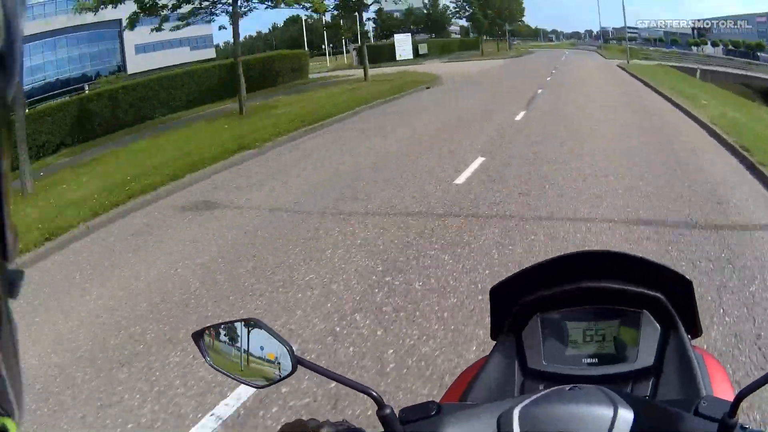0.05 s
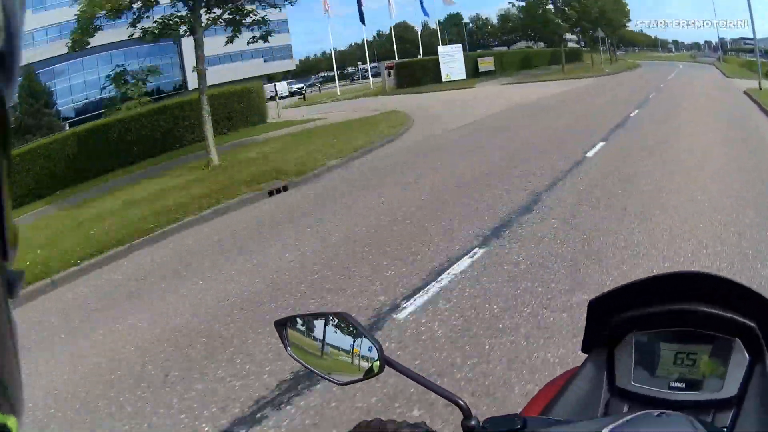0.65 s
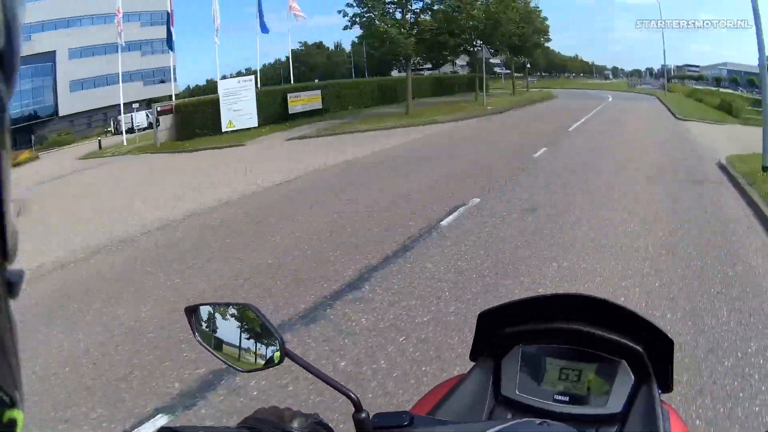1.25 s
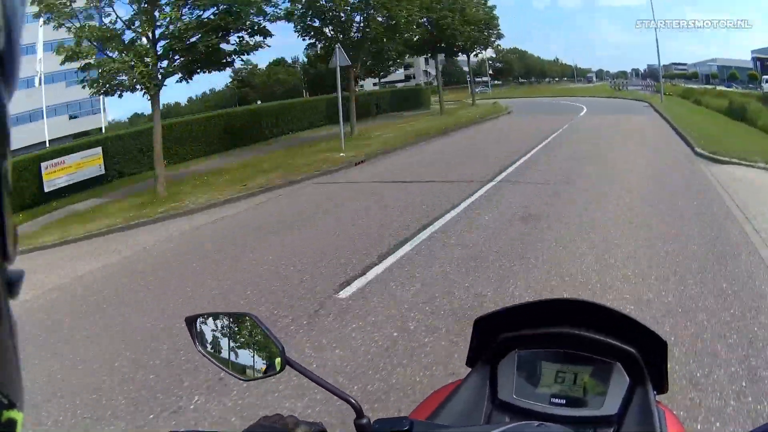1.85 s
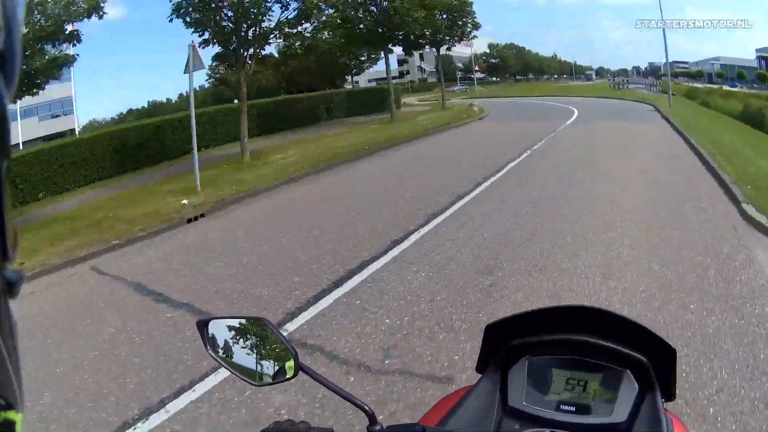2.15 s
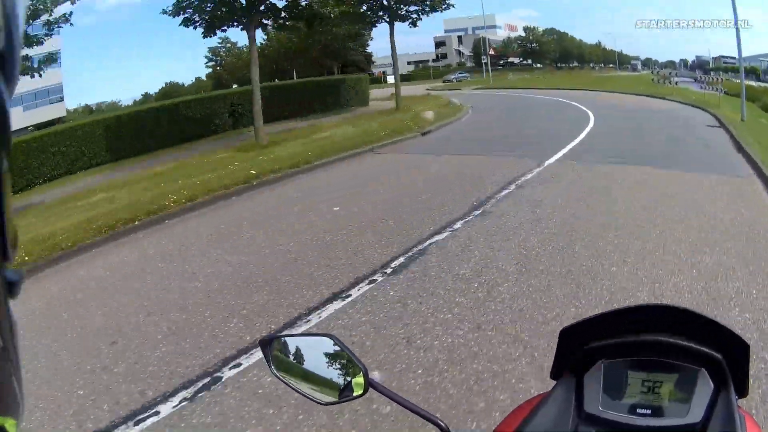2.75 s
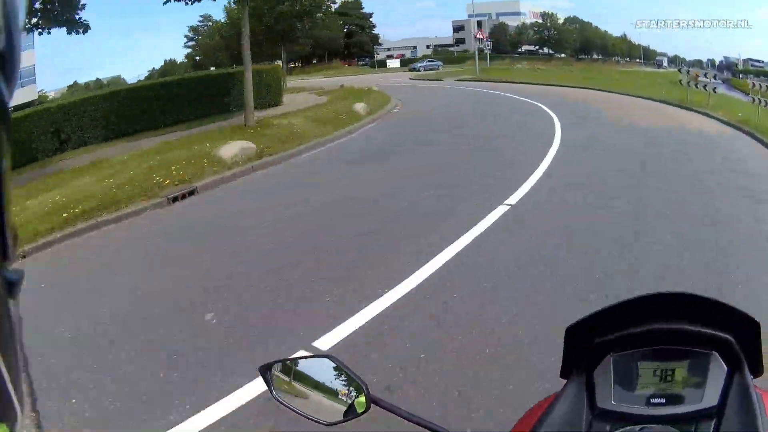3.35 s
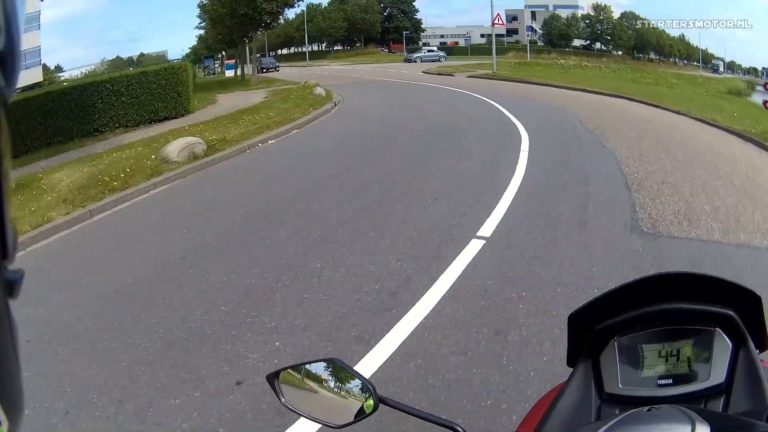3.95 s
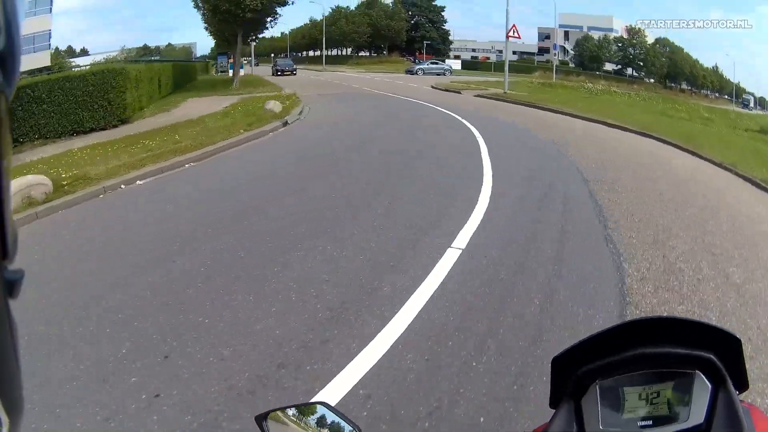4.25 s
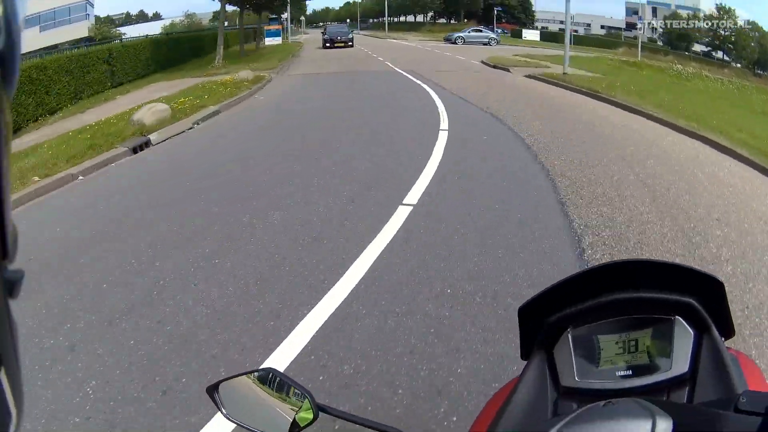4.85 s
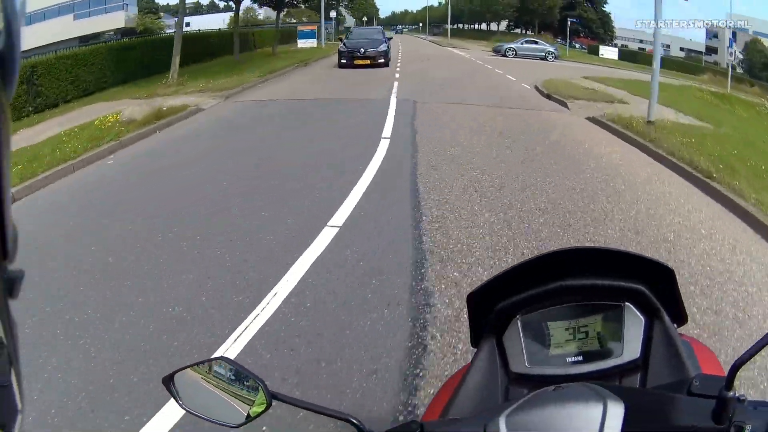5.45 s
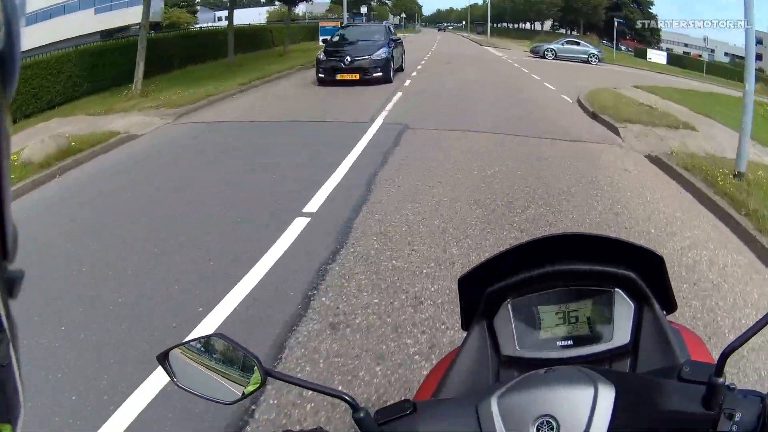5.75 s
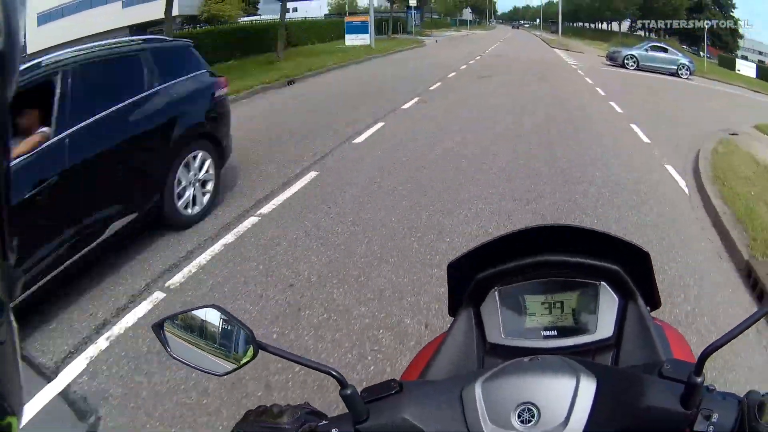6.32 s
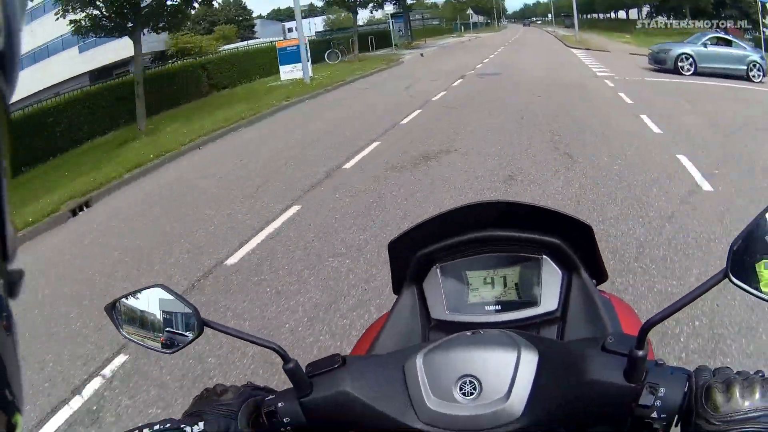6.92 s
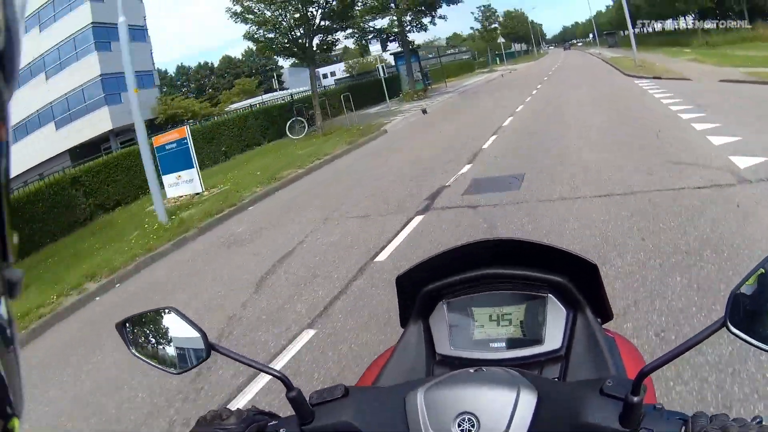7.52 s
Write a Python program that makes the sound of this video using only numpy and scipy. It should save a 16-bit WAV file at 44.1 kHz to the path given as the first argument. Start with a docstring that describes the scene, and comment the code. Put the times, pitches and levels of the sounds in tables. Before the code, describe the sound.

A small scooter engine eases off, burbles while coasting, then revs up again, with road roar, buffeting wind and a faint passing car.

```python
"""A single-cylinder scooter shuts its throttle, coasts through a bend and pulls away; microphone at the
rider's helmet, in the open air. Under power each firing thumps the exhaust, honks the airbox and barks
off the panels; on the overrun the engine only burbles and the drive whines. Tyres and air roar underneath,
wind buffets the microphone, and the rider's gear rustles and ticks close by. Short dull knocks sound while
it coasts, then hard, ragged firings as it pulls away; near the end a car passes two metres off."""
import sys
import numpy as np
from scipy import signal
from scipy.fft import rfft, irfft, next_fast_len
from scipy.io import wavfile
from scipy.ndimage import uniform_filter1d, map_coordinates

SR = 44100
rng = np.random.default_rng(int(sys.argv[2]) if len(sys.argv) > 2 else 0)


def inscribe(sig):
    """Save sig as 16-bit PCM at rate SR to the path in sys.argv[1].

    A 1-D sig is mono; a 2-D sig holds one channel per row.
    Samples are clipped to [-1, 1] before scaling.
    """
    pcm = np.round(np.clip(np.atleast_2d(sig).T, -1, 1) * 32767)
    wavfile.write(sys.argv[1], SR, pcm.astype(np.int16))


N = 334278
TIME = np.arange(N) / SR

# engine speed: time_s, firing_hz
FIRING_RATE = [(0, 56.8), (.21, 49.4), (.36, 44.3), (.59, 41), (1.15, 39.4), (1.65, 38.3), (2.2, 35.6),
               (2.45, 34.4), (3.2, 31.3), (4.1, 29.6), (4.75, 28.6), (5.03, 33.1), (5.3, 40.6),
               (5.55, 46.4), (5.8, 50.7), (6.02, 53.7), (6.25, 54.85), (6.6, 55.9), (7.58, 57.45)]
# the throttle shuts, opens after the bend, then eases a little: time_s, load_db
ENGINE_LOAD = [(0, 3), (.09, -14.5), (.25, -11.5), (.42, -8.5), (.6, -23.5), (4.66, -27), (4.78, -9),
               (4.92, -3), (5.05, -3.5), (5.19, 1.5), (5.3, -2.5), (5.7, -1), (5.85, 2.5), (6.5, 1.5),
               (6.7, -0.54), (7.58, -0.5)]
# the scooter's pace: time_s, speed_kmh
ROAD_SPEED = [(0, 64), (.8, 65), (1.6, 62.2), (2.3, 58.5), (2.75, 54.3), (3.3, 48.9), (4, 44), (5.3, 36),
              (7.58, 46)]
# gusts around the helmet: centre_s, half_width_s, buffet_db, roar_db
WIND_GUSTS = [(0, 0.13, -32, -29), (0.98, 0.12, -24.5, -38.5), (1.27, 0.076, -34, -35.5),
              (1.65, 0.28, -30.5, -38.5), (2.29, 0.084, -26.5, -51), (3.643, 0.077, -21.5, -37),
              (3.944, 0.045, -26.5, -54), (4.43, 0.076, -30, -35), (6.506, 0.16, -34, -42)]


def amp(db):
    """Decibels to gain."""
    return 10 ** (np.asarray(db) / 20)


def unit(x):
    """Scales to rms 1."""
    return x / np.sqrt(np.mean(x ** 2) + 1e-20)


def curves(rows):
    """Each column of a time table at every sample."""
    times, *columns = np.transpose(rows)
    return [np.interp(TIME, times, column) for column in columns]


def response(spectrum, hz):
    """Gain of a spectrum at hz, falling 30 dB in the octave beyond each end."""
    freqs, db = np.transpose(spectrum)
    freqs, db = np.r_[freqs[0] / 2, freqs, freqs[-1] * 2], np.r_[db[0] - 30, db, db[-1] - 30]
    return amp(np.interp(np.log(hz + 1e-3), np.log(freqs), db))


def colour(x, spectrum):
    """Filters x by a spectrum."""
    size = next_fast_len(N)
    return irfft(rfft(x, size) * response(spectrum, np.fft.rfftfreq(size, 1 / SR)), size)[:N]


def wander(rate_hz):
    """Smooth random motion of rms 1."""
    knots = rng.standard_normal(8192)
    return unit(np.interp(TIME * rate_hz * 2, np.arange(len(knots)), knots))


def swell(centre_s, half_width_s):
    """A bell-shaped rise and fall of height 1."""
    return np.exp(-((TIME - centre_s) / half_width_s) ** 2)


def per_firing(cycles):
    """Glides to a new random value each cycle."""
    return np.interp(cycles, np.arange(N), rng.standard_normal(N))


def by_speed(cruise_db, per_octave, cruise_kmh=65):
    """Level in dB of a sound that grows with road speed."""
    return cruise_db + per_octave * np.log2(curves(ROAD_SPEED)[0] / cruise_kmh)


def rev_octaves(pulling_hz=56):
    """Engine speed in octaves above pulling revs."""
    return np.log2(curves(FIRING_RATE)[0] / pulling_hz)


def by_engine(pulling_db, per_octave, per_load):
    """Level in dB of a sound that grows with revs and load."""
    return pulling_db + per_octave * rev_octaves() + per_load * curves(ENGINE_LOAD)[0]


def hum(hz, orders, waver, flutter_db=1.5):
    """A turning part: wavering lines on multiples of its speed; orders lists multiple, level_db."""
    turns = np.cumsum(hz * (1 + waver * wander(60))) / SR
    return unit(sum(amp(db + flutter_db * wander(6.5)) * np.sin(2 * np.pi * k * turns) for k, db in orders))


def pulses(cycles, hz, spectrum, smear_rad, first, last, tilt_db=0, odd_db=0, sway_db=0):
    """Firing pulses ring a resonant body; harmonics first to last can sway as the rider's head moves."""
    grid = np.fft.fftfreq(8192, 1 / SR)
    minimum_phase = -signal.hilbert(np.log(response(spectrum, abs(grid)))).imag
    frames = np.arange(0, N, 256)
    multiples = np.arange(first, last + 1)[:, None]
    harmonic_hz = multiples * hz[frames]
    phases = np.interp(harmonic_hz, grid[grid >= 0], minimum_phase[grid >= 0])
    phases += smear_rad * rng.standard_normal(multiples.shape)
    sway = unit(uniform_filter1d(uniform_filter1d(rng.standard_normal(phases.shape), 30), 20))
    odd = (multiples % 2 == 1) & (multiples > 1)
    brightening_db = np.log2(multiples) * (tilt_db * np.ones(N))[frames]
    gains = response(spectrum, harmonic_hz) * amp(brightening_db + odd_db * odd + sway_db * sway)
    gains /= np.sqrt((gains ** 2).sum(0) / 2)  # rms 1 at any revs
    angle = 2 * np.pi * (cycles % 1)
    return sum(np.interp(TIME, TIME[frames], gain) * np.cos(k * angle + np.interp(TIME, TIME[frames], phase))
               for k, (gain, phase) in enumerate(zip(gains, phases), first))


def puffs(cycles, spectrum, fall_db, shift=1):
    """Turbulent gas bursts out once a cycle and dies away; shift scales its resonances."""
    clock = np.cumsum(shift * np.ones(N)) / SR
    bursts = rng.standard_normal(N) * amp(-fall_db * (np.interp(TIME, clock, cycles) % 1))
    return unit(map_coordinates(colour(bursts, spectrum), [clock * SR], mode="mirror"))


def crackle(spectrum, per_s, spread_db):
    """Random tiny snaps, a few much larger than the rest, filtered by a spectrum."""
    sizes = amp(spread_db * np.minimum(rng.exponential(1, N), 2.8))
    snaps = (rng.random(N) < per_s / SR) * sizes * rng.choice([-1, 1], N)
    return unit(colour(snaps, spectrum))


def road_roar():
    """Tyre and air roar grows with speed, swells in gusts and flutters with turbulence at the helmet."""
    roar_spectrum = [(30, 9.5), (70, 7), (150, -3.5), (300, -1.5), (500, -2), (620, -2), (730, -10),
                     (850, -6.5), (1100, -17.5), (1450, -24), (2100, -29), (2900, -38), (4000, -40),
                     (5000, -52), (13000, -69)]  # tyres and air: freq_hz, level_db
    roar = unit(colour(rng.standard_normal(N) * amp(wander(35)), roar_spectrum))
    gusts = sum(amp(db) * swell(s, width) for s, width, _, db in WIND_GUSTS)
    return np.hypot(amp(by_speed(-31.5, per_octave=12.5)), gusts) * roar


def wind_buffet():
    """Lumps of air pressure on the microphone: headwind plus gusts, with a lull as the bend ends."""
    buffet_spectrum = [(5, 2), (16, 6.5), (30, 2), (55, -6.5), (85, -18.5), (140, -24), (400, -53)]  # pressure on the microphone: freq_hz, level_db
    lumps = unit(colour(rng.standard_normal(N), buffet_spectrum))
    lumps /= np.sqrt(uniform_filter1d(lumps ** 2, SR // 6) + 1e-6)  # evens out slow swings
    gusts = sum(amp(db) * swell(s, width) for s, width, db, _ in WIND_GUSTS)
    lull_db = -6 * swell(4.9, .22)
    return np.hypot(amp(by_speed(-30.5, per_octave=3.3) + lull_db), gusts) * lumps


def passing_car(closest_s=6.48, closest_m=2.0, closing_m_per_s=21, closest_db=-45.5):
    """The tyres of a car in the other lane swell and fade with distance."""
    tyre_swish = [(500, -9), (1000, 1.5), (1500, 1), (2200, -5.5), (3200, -22), (6000, -38.5)]  # freq_hz, level_db
    distance_m = np.hypot(closest_m, closing_m_per_s * (TIME - closest_s))
    return amp(closest_db) * closest_m / distance_m * unit(colour(rng.standard_normal(N), tyre_swish))


def fabric_rustle():
    """Close to the microphone, fabric rubs in short gritty bursts and rustles as the rider shifts."""
    fabric_spectrum = [(500, -11), (1200, 15), (1900, 9), (3800, 2.5), (5000, 0), (7000, -4),
                       (10000, -11.5), (12500, -22.5), (15000, -28)]  # rubbing cloth: freq_hz, level_db
    rubs = [(0.155, 0.043, -53), (0.209, 0.066, -49), (0.326, 0.046, -47), (0.367, 0.086, -53),
            (0.496, .06, -56.5), (0.56, 0.042, -52), (3.205, 0.051, -61), (3.392, 0.047, -57.5),
            (3.459, 0.056, -49), (3.512, 0.048, -55.5), (3.59, 0.062, -52), (3.638, 0.029, -45.5),
            (3.711, 0.027, -52), (3.763, 0.021, -51.5), (3.815, 0.03, -56), (3.918, 0.05, -58),
            (4.339, 0.044, -57), (4.438, 0.05, -50.5), (4.49, 0.05, -50), (4.834, 0.074, -59.5),
            (4.984, 0.034, -57), (6.553, 0.07, -58)]  # brief rubs: centre_s, width_s, level_db
    fidgets = [(.42, .3, -64), (3.728, 0.13, -60.5), (4.077, 0.048, -62), (4.207, 0.074, -61.5),
               (4.592, 0.3, -69), (5.187, 0.035, -57.5), (5.33, 0.076, -59), (6.503, 0.11, -63)]  # faint spells of rustling: centre_s, half_width_s, level_db
    rubbing = sum(amp(db) * swell(s, width / 2) for s, width, db in rubs)
    fidgeting = sum(amp(db) * swell(s, width) for s, width, db in fidgets) * amp(.5 * wander(19))
    return np.hypot(rubbing, fidgeting) * crackle(fabric_spectrum, per_s=4000, spread_db=5.5)


def fasteners(tick_gain_db=10.5, decay_s=.0002):
    """The rider's fasteners rattle in the airflow and with the engine's shaking; a few tick sharply."""
    rattle_spectrum = [(2000, -26.5), (4500, 1.5), (7000, -4.5), (9000, -10.5), (11000, -14), (13000, -29)]  # small fasteners: freq_hz, level_db
    ticks = [(0.191, -53, 5990), (0.2712, -45, 6860), (0.511, -54, 6500), (0.9785, -53, 5750),
             (1.373, -55, 6170), (1.5558, -51, 6000), (1.803, -58, 6360), (2.043, -56, 5930),
             (2.6222, -59, 6010), (3.205, -53, 7200), (3.613, -57, 10500), (3.924, -53, 5850),
             (4.0826, -49, 6770), (4.357, -56, 7000), (5.1292, -53.5, 6030), (5.6604, -53.5, 6700),
             (6.3714, -53.5, 5800)]  # single sharp ticks: start_s, level_db, pitch_hz
    airflow = amp(by_speed(-76.5, per_octave=5.8))
    shaking = amp(by_engine(-74, per_octave=10, per_load=.5))
    out = np.hypot(airflow, shaking) * amp(2.2 * wander(12))
    out *= crackle(rattle_spectrum, per_s=700, spread_db=4)
    age = TIME[:1000]
    for s, db, hz in ticks:
        ring = np.exp(-age / decay_s) * np.sin(2 * np.pi * hz * age)
        out[round(s * SR):][:len(age)] += amp(db + tick_gain_db) * ring
    return out


def knocks_and_hard_firings(gain_db=2, rise_s=.0007, decay_s=.004):
    """Short dull knocks while coasting, then hard, ragged firings pulling away; each rings briefly."""
    knocks = [(0.585, -24, 600), (0.8, -29, 611), (1.33, -24.5, 592), (1.458, -25, 584),
              (2.248, -35.5, 730), (4.812, -33, 538), (5.012, -31, 540), (5.327, -33, 814),
              (5.445, -26, 616), (5.535, -22, 560)]  # dull knocks, from 4.8 s hard firings: start_s, level_db, pitch_hz
    ring_modes = [(1, 1.5), (1.45, -8.5), (2.05, -18.5)]  # partials of each ring: pitch_multiple, level_db
    out, age = np.zeros(N), TIME[:SR // 20]
    envelope = (1 - np.exp(-age / rise_s)) * np.exp(-age / decay_s)
    for s, db, hz in knocks:
        ring = sum(amp(mode_db) * np.sin(2 * np.pi * k * hz * age) for k, mode_db in ring_modes)
        out[round(s * SR):][:len(age)] += amp(db + gain_db) * envelope * ring
    return out


def drive(gear_hz_per_kmh=23.17):
    """The belt drive hums on two falling notes; the gears whine and sizzle, following road speed."""
    belt_hum = [(.3, 139.8, -53, -57), (1, 132.7, -40, -46), (1.3, 129.8, -43.5, -40.5),
                (1.7, 126.5, -51, -43.5), (2, 120.1, -60, -49), (2.45, 108.5, -43.5, -55),
                (2.8, 101.1, -49, -43.5), (3.3, 92.6, -55, -44.5), (3.8, 85.4, -64, -56),
                (4.6, 75.4, -80, -80)]  # time_s, base_hz, second_harmonic_db, third_harmonic_db
    gear_cover = [(1050, -59.5), (1200, -53.5), (1330, -62), (1480, -65.5)]  # how loudly the cover rings: pitch_hz, level_db
    gear_sizzle = [(2700, -23.5), (3300, -2), (3570, 6), (3720, 2), (3900, 5), (4030, -7), (4200, 1.5),
                   (4400, -11), (5000, -22)]  # freq_hz, level_db
    belt_hz, second_db, third_db = curves(belt_hum)
    belt = amp(second_db) * hum(belt_hz, [(2, 0)], waver=.006)
    belt += amp(third_db) * hum(belt_hz, [(3, 0)], waver=.005)
    gear_hz = gear_hz_per_kmh * curves(ROAD_SPEED)[0]
    whine = response(gear_cover, gear_hz) * hum(gear_hz, [(1, 0)], waver=.04)
    sizzle = amp(by_speed(-75.5, per_octave=3.9)) * unit(colour(rng.standard_normal(N), gear_sizzle))
    return belt + whine + sizzle


def overrun(cycles, hz, load_db, shut_db=-5.5):
    """A note runs down as the throttle snaps shut; a burble takes over once the load is below shut_db."""
    burble_spectrum = [(30, -9.5), (65, -21), (95, -1.5), (118, -0.5), (135, 2), (152, -13.5), (200, -16),
                       (265, -13.5), (305, -12.5), (360, -9.5), (480, -9), (540, -24.5), (610, -14.5),
                       (700, -27.5), (950, -23.5), (1500, -32)]  # the coasting engine: freq_hz, level_db
    run_down_orders = [(8, 5), (10.1, -1), (12.1, 0), (17, -11)]  # lines of the falling note: firing_multiple, level_db
    shut = 1 / (1 + amp(load_db - shut_db) ** 2)
    burble_db = by_engine(-34.5, per_octave=3.43, per_load=0) + 1.5 * wander(6)
    burble = pulses(cycles, hz, burble_spectrum, smear_rad=1.53, first=1, last=44, sway_db=1.8)
    run_down = amp(-33) * swell(.03, .22) * hum(hz, run_down_orders, waver=.0032)
    return shut * amp(burble_db) * burble + run_down


def gas_rush(blowdown):
    """Exhaust gas hisses out, pulsing slightly with each firing."""
    rush_spectrum = [(90, -8), (320, -0.5), (490, 0.5), (590, 2.5), (710, -3.5), (920, -4.5), (1300, -9),
                     (1500, -18.5), (2100, -26.5), (3000, -36.5), (4100, -35.5), (5000, -45), (7000, -52.5),
                     (13000, -78)]  # gas noise: freq_hz, level_db
    return amp(by_engine(-31.5, per_octave=17, per_load=.53)) * puffs(blowdown, rush_spectrum, fall_db=1)


def panel_bark(blowdown, hz, load_db, rough, uneven_db=1.2):
    """Firings bark off the panels: ragged cracks at low revs, firming into a tone as the revs rise."""
    bark_spectrum = [(740, -30.5), (790, -13.5), (840, -1.5), (885, 7.5), (915, 6.5), (965, 7.5),
                     (1010, -1.5), (1060, -20.5), (1100, 6), (1160, -9.5), (1210, -2.5), (1240, -7),
                     (1275, -3), (1315, -14), (1365, -2.5), (1420, -12), (1530, -22), (1630, -28),
                     (1720, -18.5), (1900, -34), (3400, -52.5)]  # the firm tone: freq_hz, level_db
    rasp_spectrum = [(740, -28), (850, 0.5), (940, 5.5), (1020, -9), (1110, -10.5), (1350, -23.5),
                     (1500, -31.5), (2400, -35.5)]  # the ragged cracks: freq_hz, level_db
    tilt_db = 2.8 * np.clip(load_db, -2.5, 2.5)  # per octave: brighter under load
    tone = pulses(blowdown, hz, bark_spectrum, smear_rad=.3, first=10, last=64, tilt_db=tilt_db)
    cracks = puffs(blowdown, rasp_spectrum, fall_db=36)
    level_db = by_engine(-34, per_octave=11.5, per_load=.83) + uneven_db * per_firing(blowdown)
    return amp(level_db) * (1.2 * (1 - rough) * tone + 1.3 * rough * cracks)


def airbox_honk(intake, hz, rough, airbox_hz=425):
    """Each intake pulse rings the airbox, breathier and more uneven at low revs."""
    airbox_spectrum = [(200, -10), (270, -17.5), (335, -11.5), (380, -11.5), (420, -1.5), (452, -3.5),
                       (478, -6.5), (503, -23.5), (530, -12.5), (560, -15), (610, -25.5), (680, -25.5),
                       (740, -20.5), (800, -41.5)]  # its resonances before shifting: freq_hz, level_db
    honk_pitch = [(0, 430), (.3, 363.1), (4.78, 360), (4.92, 388), (5.2, 411.5), (5.5, 403), (5.75, 396),
                  (6.1, 425.2), (6.6, 433)]  # climbs as the throttle opens: time_s, pitch_hz
    shift = curves(honk_pitch)[0] / airbox_hz
    tone = pulses(intake, hz / shift, airbox_spectrum, smear_rad=.6, first=6, last=22, sway_db=1.8)
    breath = puffs(intake, airbox_spectrum, fall_db=8, shift=shift)
    level_db = by_engine(-25.5, per_octave=5.8, per_load=1) + 1.5 * rough * per_firing(intake)
    return amp(level_db) * (tone + 1.4 * rough * breath)


def exhaust_thump(blowdown, hz):
    """Each firing thumps the silencer; the crank turns twice per firing, so odd overtones are weaker."""
    silencer = [(40, -5.5), (56, -1), (85, 0.5), (112, 3.5), (145, 2), (170, -2), (195, -0.5), (226, 0),
                (245, -6), (268, 0.5), (283, 6.5), (295, -7)]  # its resonances: freq_hz, level_db
    thump = pulses(blowdown, hz, silencer, smear_rad=.81, first=1, last=5, odd_db=-9)
    return amp(by_engine(-24, per_octave=22.6, per_load=.44)) * thump


def engine():
    """One cylinder below the rider: its firing cycle times the thump, honk, bark, gas rush and burble."""
    hz, = curves(FIRING_RATE)
    load_db, = curves(ENGINE_LOAD)
    cycles = np.cumsum(hz) / SR + .00023 * wander(22)  # no two cycles take quite the same time
    strength = amp(.48 * wander(25))  # nor burn quite alike
    blowdown, intake = cycles - .68, cycles - .03  # counted from the opening of each valve
    rough = np.clip(.1 - .62 * rev_octaves(), 0, 1)  # ragged at low revs
    power = exhaust_thump(blowdown, hz) + airbox_honk(intake, hz, rough)
    power += panel_bark(blowdown, hz, load_db, rough)
    return strength * power + gas_rush(blowdown) + overrun(cycles, hz, load_db)


def scene():
    """The scooter, its wind and one passing car, in mono at the rider's helmet."""
    scooter = engine() + drive() + knocks_and_hard_firings()
    return (scooter + road_roar() + passing_car() + wind_buffet() + fabric_rustle() + fasteners())[None]


def record(dry):
    """The recorder's band limit, with ends eased over a few milliseconds."""
    eased = dry * signal.windows.tukey(N, .0015)
    lowpass = signal.firwin(511, cutoff=14800, window=("kaiser", 9), fs=SR)
    return signal.oaconvolve(eased, lowpass[None], "same")


dry = scene()
out = record(dry)
inscribe(out)
```